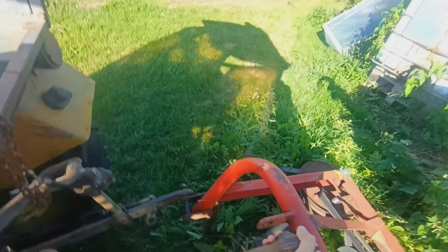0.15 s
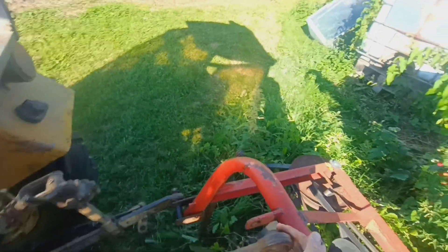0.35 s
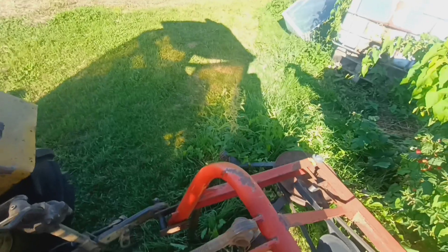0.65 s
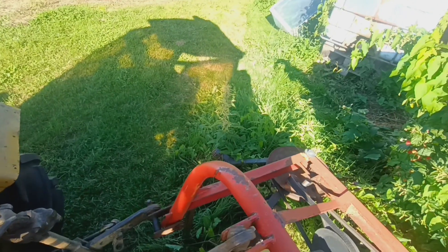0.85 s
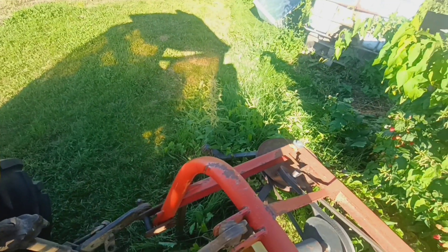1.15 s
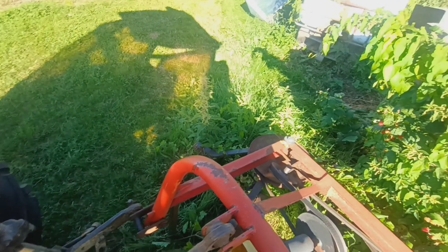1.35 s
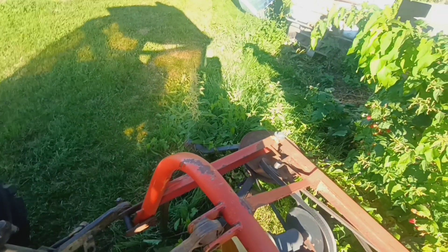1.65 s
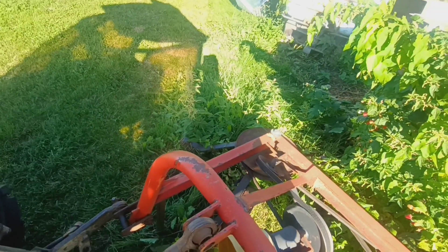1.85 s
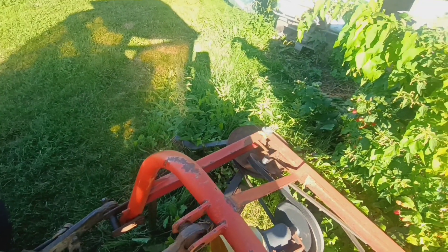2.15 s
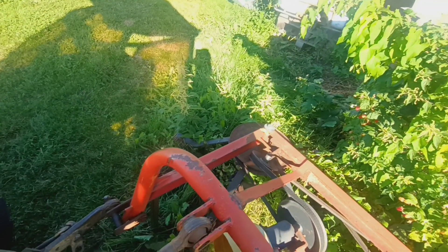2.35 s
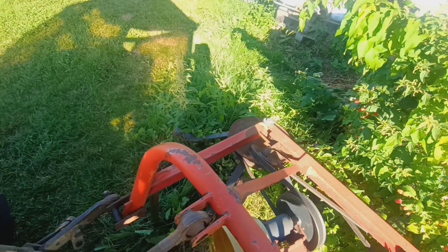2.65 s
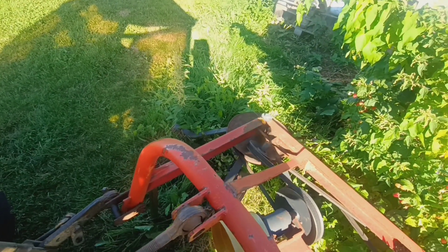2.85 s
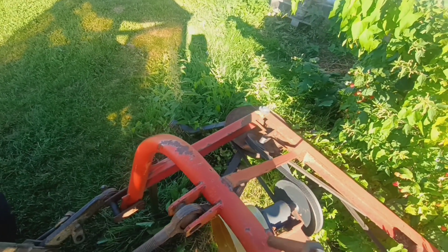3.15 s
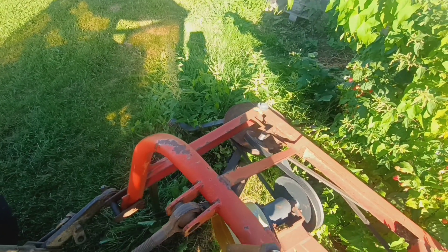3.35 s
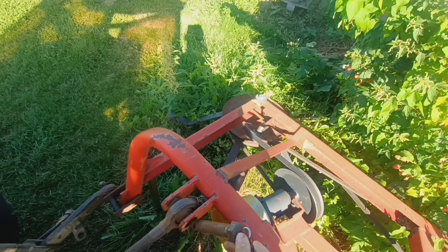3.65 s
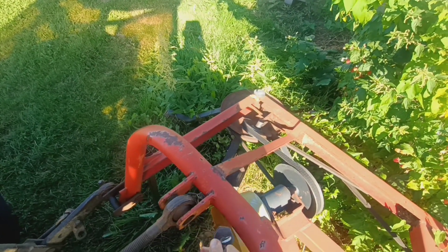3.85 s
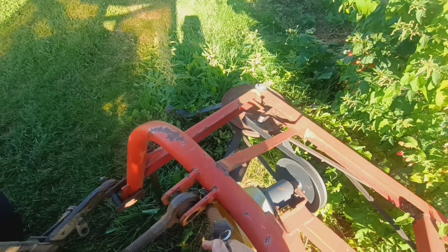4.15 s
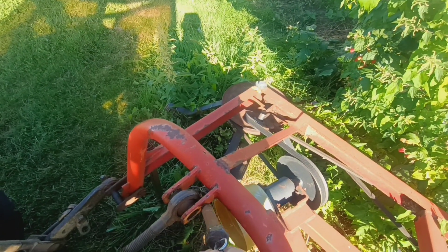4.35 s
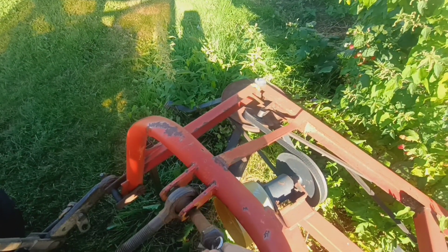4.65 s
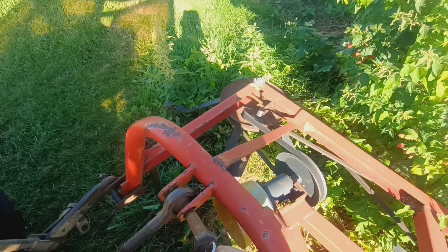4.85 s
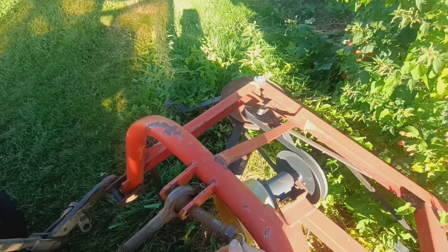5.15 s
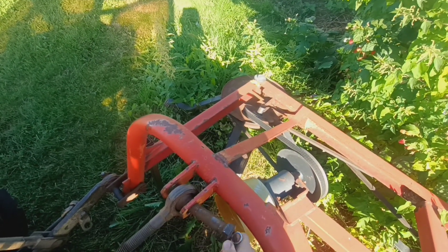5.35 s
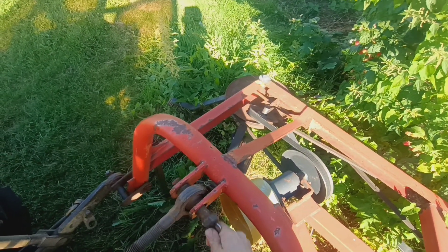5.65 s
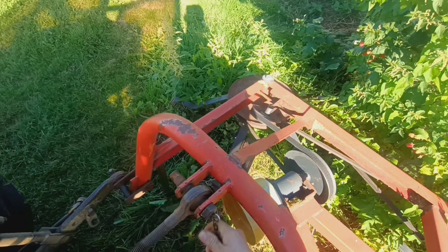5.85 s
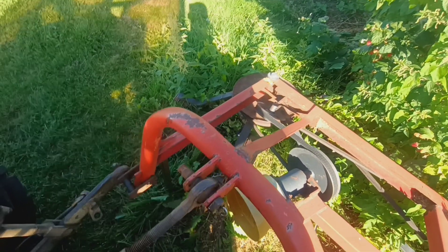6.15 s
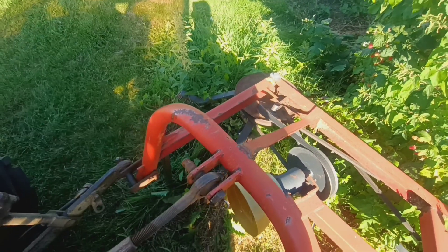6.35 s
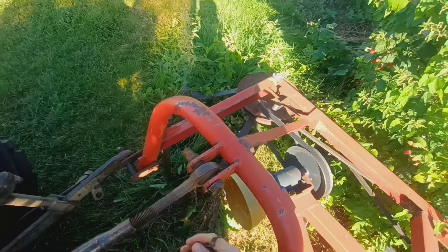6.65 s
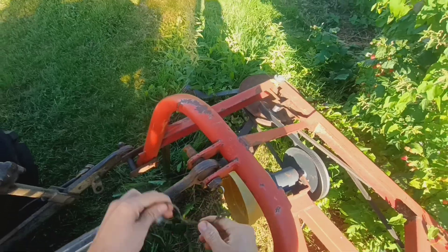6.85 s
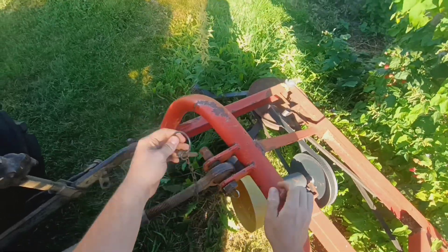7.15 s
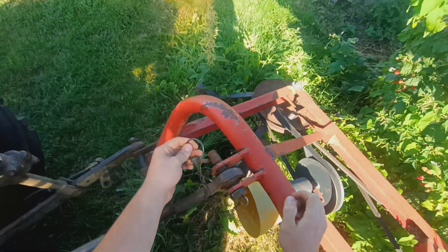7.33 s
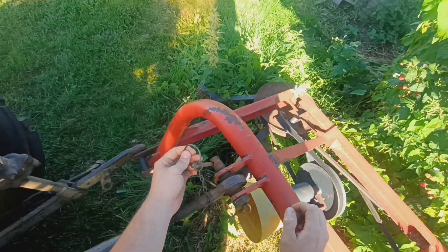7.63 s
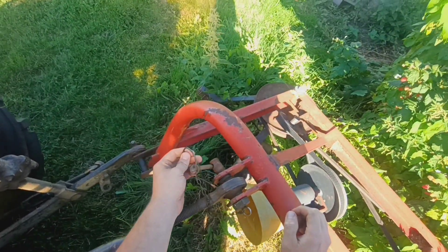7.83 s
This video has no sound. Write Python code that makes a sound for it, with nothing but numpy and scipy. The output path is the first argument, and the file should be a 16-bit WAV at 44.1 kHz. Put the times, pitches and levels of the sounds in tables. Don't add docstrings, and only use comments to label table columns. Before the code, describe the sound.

An old diesel tractor idles slowly on the left, thumping low and unevenly, about two cycles a second, with steady mechanical clatter and soft hum. Close to the microphone, hands work steel hitch parts: a clank at the start, hard bright cracks around one and three seconds, several ringing knocks and short scrapes, then light clinks of a small clip. Open lawn, dry, stereo.

```python
import sys
import numpy as np
from scipy import signal
from scipy.fft import rfft, irfft
from scipy.io import wavfile
from scipy.ndimage import uniform_filter1d

SR = 44100
rng = np.random.default_rng(int(sys.argv[2]) if len(sys.argv) > 2 else 0)


def generate_wav(sig):
    pcm = np.round(np.clip(np.atleast_2d(sig).T, -1, 1) * 32767).astype(np.int16)
    wavfile.write(sys.argv[1], SR, pcm)


def voltage_ratio(level):
    return 10 ** (np.asarray(level, float) / 20)


N = 352344
TIME = np.arange(N) / SR
SIZE = 8192
IMPACT_TIME = np.arange(SIZE) / SR
HZ = np.fft.rfftfreq(SIZE, 1 / SR) + 1


def unit(x):
    return x / np.sqrt(np.mean(x ** 2))


def top(x):
    return np.sqrt(uniform_filter1d(np.mean(x ** 2, axis=0), size=260).max())


def add(out, s, x):
    i = max(int(s * SR), 0)
    x = x[..., :max(N - i, 0)]
    out[..., i:i + x.shape[-1]] += x


def panned(db):
    return voltage_ratio(np.array([db, -db]) / 2)


def blend(noise, like):
    return np.sqrt(like) * noise[0] + np.sqrt(1 - like) * noise[1:]


def ports(like, size=N):
    return blend(rng.standard_normal((3, size)), np.clip(like, 0, 1))


def burst(rise, hold, t60, size=SIZE):
    t = np.arange(size) / SR
    fall = voltage_ratio(-60 * np.clip(t - rise - hold, 0, None) / t60)
    return np.clip(t / rise, 0, 1) * fall


def lumps(db, count=90):
    knots = np.linspace(0, HZ[-1] ** 0.5, count)
    return voltage_ratio(db * np.interp(HZ ** 0.5, knots, rng.standard_normal(count)))


def grit(depth, samples):
    flutter = uniform_filter1d(rng.standard_normal(SIZE), max(int(samples), 1))
    return voltage_ratio(depth * unit(flutter))


BANDS_HZ = [350, 950, 2700, 6300, 9500]


def bands(fall_db=-16):
    place = np.log2(HZ)
    centres = np.log2(BANDS_HZ)
    slices = np.array([np.interp(place, centres, row) for row in np.eye(len(BANDS_HZ))])
    above = np.clip(place - centres[-1], 0, None)
    below = np.clip(np.log2(250 / HZ), 0, None)
    return slices * voltage_ratio(fall_db * (above + below))


# (frequency [Hz], density [dB per Hz])
LAWN = [(18, -33), (30, -10), (108, 4.5), (182, -3.5), (591, -3.5), (767, -11), (1590, -19.5),
        (2020, -15.5), (3230, -25.5), (6210, -40), (15500, -43.5)]


def lawn(level_db=-44):
    hz = np.fft.rfftfreq(N, 1 / SR) + 1
    points = np.array(LAWN)
    colour = voltage_ratio(np.interp(np.log(hz), np.log(points[:, 0]), points[:, 1]))
    own = np.clip((hz / 1100) ** 2, 0.015, 0.6)
    noise = rfft(rng.standard_normal((3, N)))
    return unit(irfft(colour * blend(noise, 1 - own), N)) * voltage_ratio(level_db)


# (time [s], left minus right [dB])
HANDS = [(0.56, -1), (1.31, 1), (1.9, 0.5), (3.0, 1), (3.2, 0.5), (3.75, -2), (4.7, -3), (5.85, -1.5),
         (5.97, 5.5), (7.2, 7.5)]


def at_hands(s):
    return panned(np.interp(s, *np.transpose(HANDS)))[:, None]


def frame(centre_hz, low_db, rise, hold, t60, octaves=0.54, low_hz=1150, top_db=-22):
    high = np.exp(-(np.log2(HZ / centre_hz) / octaves) ** 2 / 2)
    low = voltage_ratio(low_db + 9) * np.exp(-(np.log2(HZ / low_hz) / 0.5) ** 2 / 2)
    treble = voltage_ratio(top_db) * np.exp(-((HZ - 6000) / 3500) ** 2)
    noise = rfft(ports(0.6, SIZE)) * (high + low + treble) * lumps(5.5, count=200)
    noise[1] *= np.exp(1j * 3.12 * np.sin(HZ / 900 + 6 * rng.random()))
    timing = [(5.5, 1.0), (4.4, 0.98), (0.11, 0.64), (0.86, 0.27), (0.6, 0.075)]
    shapes = np.array([burst(rise * late, hold, t60 * slow) for late, slow in timing])
    slices = irfft(bands(fall_db=-44)[:, None] * noise, SIZE)
    return np.einsum("bcn,bn->cn", slices, shapes) * grit(0.28, 40)


# (time [s], length [s], level
# [dB], centre [Hz], low part [dB])
SCRAPES = [(0.901, 0.049, -35.5, 2500, 35), (1.302, 0.018, -27, 4000, -8), (2.38, 0.17, -66, 4000, -5),
           (4.63, 0.11, -46.5, 3230, -8), (5.644, 0.14, -33.5, 3060, 2.5)]


def scrapes():
    out = np.zeros((2, N))
    for s, length, db, centre_hz, low_db in SCRAPES:
        rub = frame(centre_hz, low_db, 0.01, length, 0.13)
        add(out, s, rub / top(rub) * grit(1.47, 140) * voltage_ratio(db + 1.5) * at_hands(s))
    return out


# (time [s], level [dB], frequency [Hz])
TINKLES = [(0.948, -36, 5360), (0.95, -45.5, 6900), (.972, -35, 599), (0.97, -43, 860),
           (1.209, -51.5, 10640), (1.317, -29, 1393), (1.805, -40.5, 1475), (2.067, -35, 3800),
           (2.069, -40, 8020), (2.279, -43.5, 4000), (2.374, -45, 4380), (3.174, -32, 4800),
           (3.176, -21.5, 6460), (3.178, -36, 1506), (3.738, -27, 4370), (3.741, -33.5, 2234),
           (3.872, -30, 1343), (5.982, -46, 7100), (4.832, -36.5, 2234), (5.168, -35, 2234),
           (3.866, -39, 2760), (3.179, -30.5, 3020), (7.467, -44, 6140), (7.741, -42.5, 6090),
           (7.93, -48, 5950), (7.971, -44.5, 7120)]


def tinkles():
    out = np.zeros((2, N))
    for s, db, hz in TINKLES:
        wobble = np.cumsum(0.075 * rng.standard_normal(SIZE)) + 2 * np.pi * rng.random((2, 1))
        shape = burst(0.0022, 0.0032, 0.12 * (6000 / hz) ** 0.41)
        add(out, s, voltage_ratio(db + 7.5) * shape * np.sin(2 * np.pi * hz * IMPACT_TIME + wobble))
    return out


# (time [s], peak [dB], centre [Hz])
CRACKS = [(1.325, -12, 4350), (3.1775, -11, 5300), (3.8673, -14, 2800), (5.6355, -27, 3000),
          (5.9825, -36, 6800)]


def cracks(t60=0.016):
    out = np.zeros((2, N))
    size = 2000
    for s, db, hz in CRACKS:
        band = signal.iirpeak(hz, 1.3, fs=SR)
        ring = signal.lfilter(*band, signal.lfilter(*band, ports(0.7, size)))
        ring *= burst(0.00029, 0.00082, t60, size)
        add(out, s, ring / np.abs(ring).max() * voltage_ratio(db) * at_hands(s))
    return out


def steel(blows, modes, rough, dense_t60, hold=0.016, soft=0.49, linger=9.5):
    out = np.zeros((2, N))
    hz, clear_db, t60 = np.transpose(modes)
    rings = np.exp(2j * np.pi * np.outer(hz, IMPACT_TIME))
    for s, db, centre_hz, low_db, ring_db in blows:
        rise = 0.0013 * voltage_ratio(-soft * (db + 39))
        near_db = -9 * np.abs(np.log2(np.maximum(hz, 1750) / centre_hz))
        near_db += np.where(hz < 1750, low_db + 6, 0)
        weights = voltage_ratio(clear_db + near_db) * np.exp(2j * np.pi * rng.random((2, len(hz))))
        drift = np.cumsum(rough * rng.standard_normal((len(hz), SIZE // 16)), axis=1)
        wobble = np.repeat(drift, 16, axis=1)
        decays = [burst(rise * 3, hold + rise * linger, decay) for decay in t60]
        ring = (weights @ (rings * np.exp(1j * wobble) * decays)).imag
        clang = frame(centre_hz, low_db, rise, hold, dense_t60)
        hit = clang / top(clang) + voltage_ratio(ring_db) * ring / top(ring)
        add(out, s, hit / top(hit) * voltage_ratio(db) * at_hands(s))
    return out


CLIP_BLOWS = [(7.16, -39, 4460, -30.0, 14), (7.1846, -28.5, 5790, -27, 24)]
CLIP = [(4460, 9, 0.25), (5790, 19, 0.038), (7160, 14, 0.074), (8200, -6, 0.23), (10900, 6, .12),
        (13900, 14, 0.058)]


def clip():
    return steel(CLIP_BLOWS, CLIP, rough=0.11, dense_t60=0.087, hold=0.0014)


# (time [s], peak [dB], centre [Hz], low part [dB], clear ring [dB])
SHAFT_BLOWS = [(0.7814, -24, 3700, -23, 1.5), (0.9459, -24.5, 4550, 2.5, -1.5),
               (0.972, -28.5, 3740, 10, 24), (1.3148, -15, 4100, -19.5, -5), (1.4561, -40, 3330, -10, -27),
               (1.805, -38.5, 3340, -22, -4), (3.1716, -16, 3060, -49, 10), (3.1752, -20.5, 4200, -29, -13),
               (3.2727, -20.5, 2720, 1.5, -2), (4.7101, -32, 2520, 3, -7), (4.9906, -36, 3140, 3, -18),
               (5.1885, -34, 2390, -4, 5), (5.681, -26.5, 3800, 3, -6.5), (5.8196, -32.5, 2950, -1, 19)]
# (time [s], peak [dB], centre [Hz], low part [dB], clear ring [dB])
SNAP = [(5.982, -27.5, 5830, -16, -24)]
# (frequency [Hz], level [dB], t60 [s])
SHAFT = [(609.6, 4, 0.076), (860, -21, 0.37), (1240, -10, 0.22), (1495, -2, 0.097), (2440, -71, 0.065),
         (2760, -6.5, 0.066), (3000, -9, 0.18), (3910, -4.5, 0.065), (4640, 6, 0.063), (4540, -4, 0.15),
         (5000, -3.5, 0.078), (6460, -41, 0.056)]


def shaft():
    blows = steel(SHAFT_BLOWS, SHAFT, rough=0.32, dense_t60=0.32)
    snap = steel(SNAP, SHAFT, rough=0.33, dense_t60=0.13, hold=0.0012, soft=0)
    return blows + snap


# (time [s], peak [dB], centre [Hz], low part [dB], clear ring [dB])
PIN_BLOWS = [(0.5596, -16.5, 2920, -14, -1.5), (2.0008, -42.5, 4060, 7, 1), (2.0667, -38.5, 2220, -21, 11),
             (2.2858, -39.5, 2170, -26, -10), (2.387, -36.5, 2340, -23, 2.5),
             (3.7368, -22.5, 3840, -1.5, -3.5), (3.8662, -16, 2860, -10.5, -1),
             (4.0904, -23.5, 3130, -3.5, 12.5), (4.649, -40, 2750, -25, 12), (4.8293, -23, 2610, -13.5, -7),
             (5.1645, -31.5, 2420, -7, -1), (5.6131, -25.5, 3260, -1, -3), (5.6243, -29.5, 3000, -35, -1),
             (5.8018, -21, 3330, -13.5, -31)]
# (frequency [Hz], level [dB], t60 [s])
PIN = [(882, -4, 0.57), (1290, -17, 0.35), (1376, -4.5, 0.17), (1680, -54, 0.13), (2234, 3.5, 0.18),
       (2825, 5.5, 0.16), (2843, -1.5, 0.27), (2869, -14, 0.097), (3560, -5, 0.11), (4000, 4.5, 0.082),
       (8200, -10, .08)]


def pin():
    return steel(PIN_BLOWS, PIN, rough=0.093, dense_t60=0.24)


# (time [s], first puff [dB], second puff [dB], third puff [dB])
CYCLES = [(-0.167, -25, -32, -26), (0.319, -23.5, -23.5, -32), (0.809, -25, -26, -28),
          (1.294, -25.5, -24.5, -34.5), (1.779, -24, -25, -30.5), (2.263, -28.5, -27, -26.5),
          (2.745, -26, -30.5, -32.5), (3.226, -27, -27, -27), (3.706, -33.5, -27, -34),
          (4.19, -30.5, -27, -34), (4.675, -29, -26.5, -30), (5.161, -27.5, -29, -30),
          (5.643, -30, -25.5, -32), (6.128, -26, -27.5, -32), (6.611, -28.5, -24.5, -33.5),
          (7.096, -23, -23.5, -31), (7.578, -29, -27.5, -29), (8.061, -17.5, -28, -30)]
# (place in the cycle [turns], force [dB], extra hiss [dB])
GEAR = [(0.31, -3.5, 8.5), (0.392, -4, 10.5), (0.545, 4.5, -8.5), (0.691, 3.5, 5), (0.816, 3.05, -11),
        (0.959, -10.5, 34), (1.054, 1.5, -3.5), (1.188, 1.5, 16)]
# (time
# [s], force [dB], extra hiss [dB])
ODD_STROKES = [(0.001, -8, -16.5), (0.518, 4.5, -20), (0.9, -0.5, 15), (1.144, 6, -24), (1.318, 12.5, 30),
               (1.804, -1, 19), (2.041, 6, 7), (2.286, 6.5, 13), (2.527, 3.5, -22), (2.725, -19, -3.5),
               (2.767, 5.5, 21), (3.134, -0.5, -1), (3.316, 5, 18), (3.862, 10, -4), (4.038, 5, 5),
               (4.214, 4.5, 26), (4.457, 4.5, 7), (4.948, 3, 5), (5.14, 4.5, -17), (5.612, 13.5, -21),
               (5.672, 2.5, 26), (5.736, 8, -17), (5.798, 10.5, 23), (5.908, 2.5, 12), (6.147, 5.2, 18),
               (6.458, 6.5, 7), (6.522, 0, -10), (6.765, -5.5, -1), (7.186, 5.5, 19), (7.494, 2.7, 11)]


def strokes():
    starts = np.array(CYCLES)[:, 0]
    turn = np.arange(len(starts))
    rows = []
    for k in turn[:-1]:
        for place, db, hiss_db in GEAR:
            rows.append((np.interp(k + place, turn, starts), db, hiss_db))
    rows = np.array(rows)
    for row in ODD_STROKES:
        rows[np.argmin(np.abs(rows[:, 0] - row[0]))] = row
    return rows[rows[:, 0] < N / SR - 0.04]


# (level near 350 Hz [dB], 950 Hz [dB], 2700 Hz [dB], 6300 Hz [dB], 9500 Hz [dB])
STROKE_DB = [(-45.5, -42.5, -53.5, -54.5, -71.5), (-64, -69, -56, -59, -67.5),
             (-53.5, -54.5, -59.5, -58, -63.5), (-51.5, -51.5, -49.5, -64, -76.5),
             (-46.5, -44, -56.5, -53, -62.5), (-46, -75, -43.5, -62, -82.5), (-53, -58.5, -57, -60.5, -67),
             (-51.5, -50, -48, -63, -82)]
# (rise [s], hold [s], t60 [s], likeness of the ports [0-1])
STROKE_SHAPE = [
    (0.017, 0.0053, 0.29, 1),
    (0.013, 0.015, 0.29, 0.42),
    (0.013, 0.012, 0.11, 0.01),
    (0.0018, 0.0053, 0.26, 0.14),
    (0.0016, 0.017, 0.034, 0),
]


def clatter(wander_db=3.0):
    out = np.zeros((2, N))
    slices = bands()
    slices /= np.sqrt(np.mean(slices ** 2, axis=1))[:, None]
    rise, hold, t60, like = np.transpose(STROKE_SHAPE)
    shapes = np.array([burst(*row) for row in zip(rise, hold, t60)])
    like = np.clip(np.interp(np.log(HZ), np.log(BANDS_HZ), like), 0, 1)
    hiss_share = np.array([0.038, 0.095, 0, 0, 0.78])
    for k, (s, db, hiss_db) in enumerate(strokes()):
        both = blend(rfft(rng.standard_normal((3, SIZE))), like)
        both = both * lumps(5.5, count=220) * lumps(2.5, count=30)
        band_db = np.array(STROKE_DB[k % 8]) + db + hiss_db * hiss_share
        band_db += wander_db * rng.standard_normal(len(slices))
        parts = irfft(slices[:, None] * both, SIZE)
        stroke = np.einsum("bcn,bn->cn", parts, voltage_ratio(band_db)[:, None] * shapes)
        add(out, s, stroke * grit(1.04, 160))
    return out


# (frequency [Hz], width [Hz], level [dB])
CASTINGS = [
    [(2170, 190, -48.5), (4520, 170, -52), (6900, 37, -55.5)],
    [(3800, 150, -55)],
    [(403.5, 12, -46.5), (10300, 140, -66.5)],
    [(1053, 24, -49.5), (2750, 19, -60), (6070, 120, -61)],
]


def castings():
    out = np.zeros((2, N))
    knock = burst(0.004, 0.018, 0.07)
    for k, modes in enumerate(CASTINGS):
        quarter = strokes()[k::4]
        uneven_db = 3 * rng.standard_normal((len(quarter), len(modes)))
        for (hz, width, db), chance_db in zip(modes, uneven_db.T):
            force = np.zeros(N)
            for (s, force_db, _), extra_db in zip(quarter, chance_db):
                add(force, s, voltage_ratio(db + force_db + extra_db) * knock)
            peak = signal.iirpeak(hz, hz / width, fs=SR)
            out += force * unit(signal.lfilter(*peak, ports(0.23)))
    return out


# (time from the second puff [s], ring [Hz], kick-back lag [s], kick-back level [dB], kick-back ring [Hz])
PUFFS = [
    (-0.061, 107.4, 0.035, -36, 120),
    (0.0001, 107, 0.031, -15, 142),
    (0.179, 111.3, 0.039, -10, 113),
]


def puffs():
    rows = []
    for s, *levels_db in CYCLES:
        for db, (shift, hz, lag, back_db, back_hz) in zip(levels_db, PUFFS):
            rows.append((s + shift, db, hz))
            rows.append((s + shift + lag, db + back_db, back_hz))
    return [row for row in rows if -0.05 < row[0] < N / SR + 0.04]


def exhaust(swell=0.014, fade=0.019, octave_db=-13, fifth_db=-14, sub_db=-20):
    out = np.zeros(N)
    t = np.arange(-2200, 3600) / SR
    shape = np.where(t < 0, np.exp(-(t / swell) ** 2), 1 / np.cosh(t / fade) ** 2)
    front = np.exp(-((t + 0.011) / 0.011) ** 2)
    push = np.exp(-(t / 0.0086) ** 2) * np.sin(2 * np.pi * 45 * t)
    for s, db, hz in puffs():
        phase = 2 * np.pi * hz * t
        overtones = voltage_ratio(octave_db) * np.cos(2.007 * phase) + voltage_ratio(fifth_db) * np.cos(1.484 * phase)
        puff = shape * np.cos(phase) + front * overtones + voltage_ratio(sub_db) * push
        missed = max(int(-(s + t[0]) * SR), 0)
        add(out, s + t[0], voltage_ratio(db) * puff[missed:])
    return out


# (time [s], engine level [dB], left minus right [dB])
HEAD = [(0, 0.5, 5), (0.699, -1, 2.5), (2.5, -4, 3.5), (4, -4.5, 2.5), (5, -3.5, 2.5), (5.998, -3, 2),
        (7.99, -2, 4.5)]


def tractor():
    s, near_db, pan_db = np.transpose(HEAD)
    gain = voltage_ratio(np.interp(TIME, s, near_db)) * panned(np.interp(TIME, s, pan_db))
    gear = (clatter() + castings()) * voltage_ratio(-1)
    engine = exhaust() * panned(1.9)[:, None] + (gear + lawn()) * gain
    engine[1] = np.roll(engine[1], 15)
    return engine


def scene():
    hitch = pin() + shaft() + clip() + scrapes() + tinkles() + cracks()
    return hitch + tractor()


def top_cut(x):
    return signal.sosfilt(signal.butter(12, 15840, fs=SR, output="sos"), x)


def record(dry):
    band = signal.butter(2, (38, 13500), "bandpass", fs=SR, output="sos")
    return top_cut(signal.sosfilt(band, dry))


dry = scene()
out = record(dry)
generate_wav(out)
```